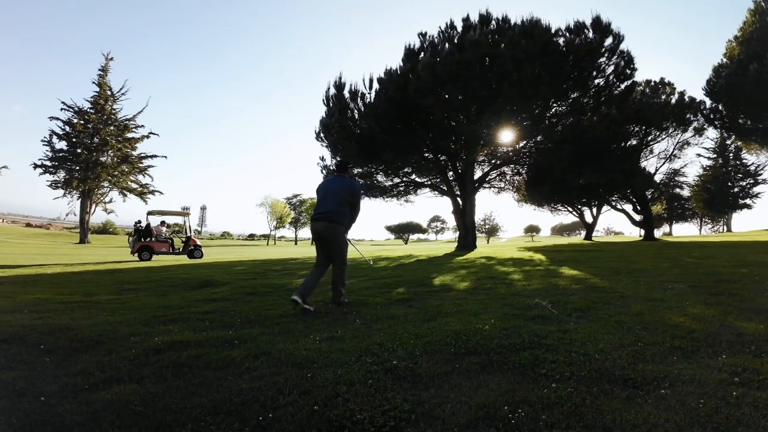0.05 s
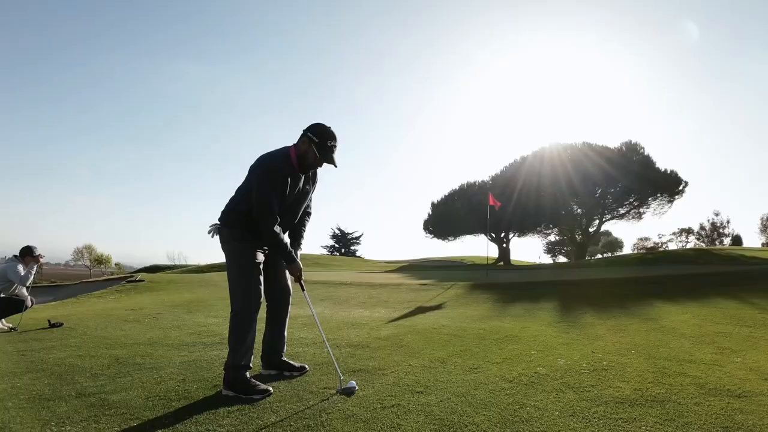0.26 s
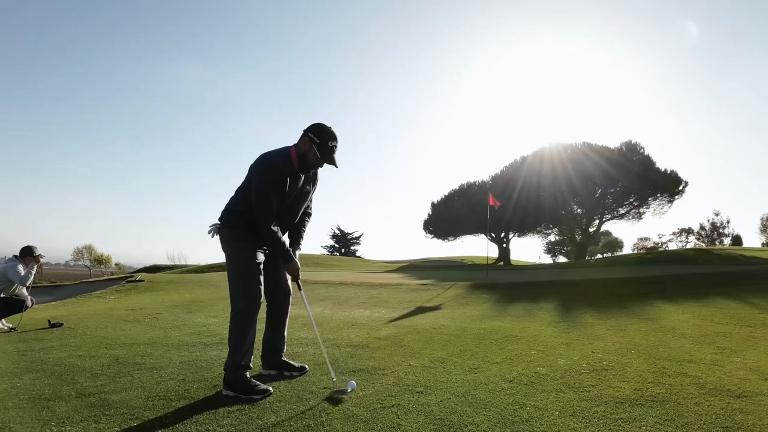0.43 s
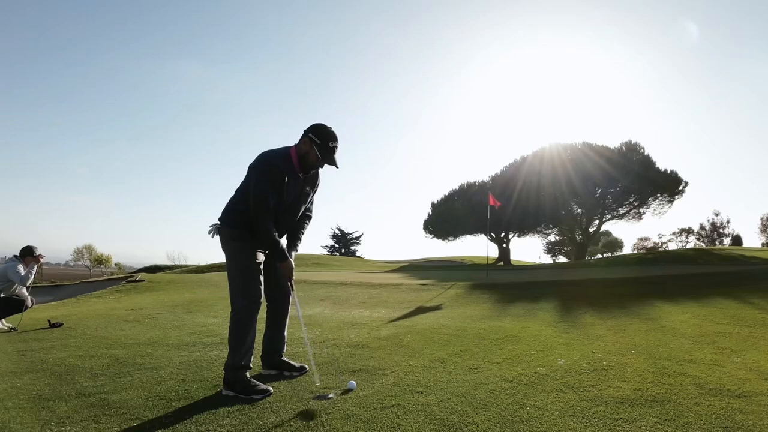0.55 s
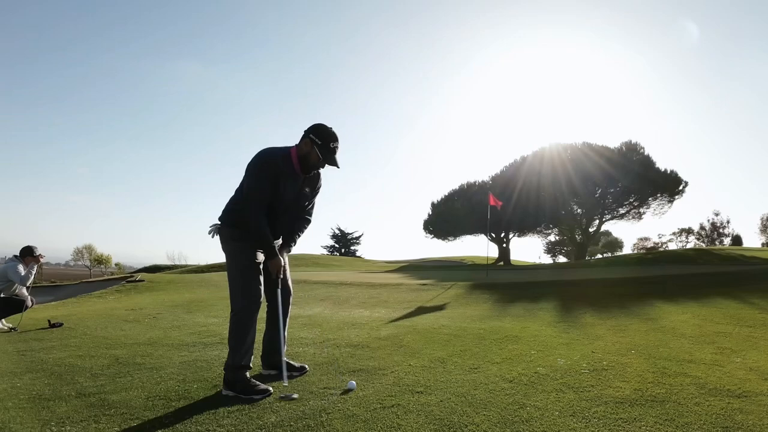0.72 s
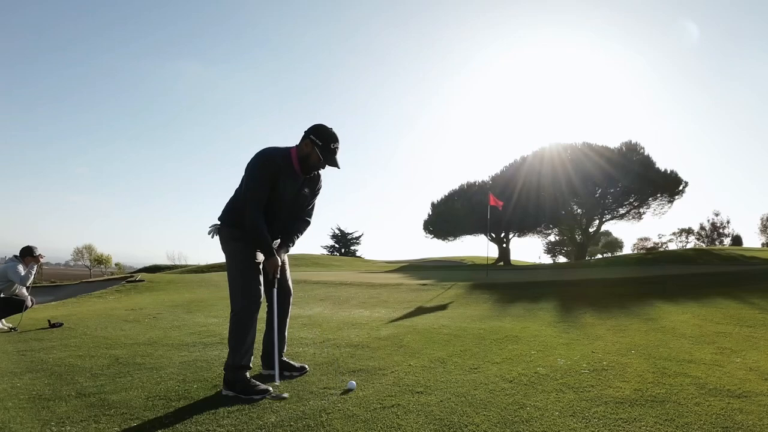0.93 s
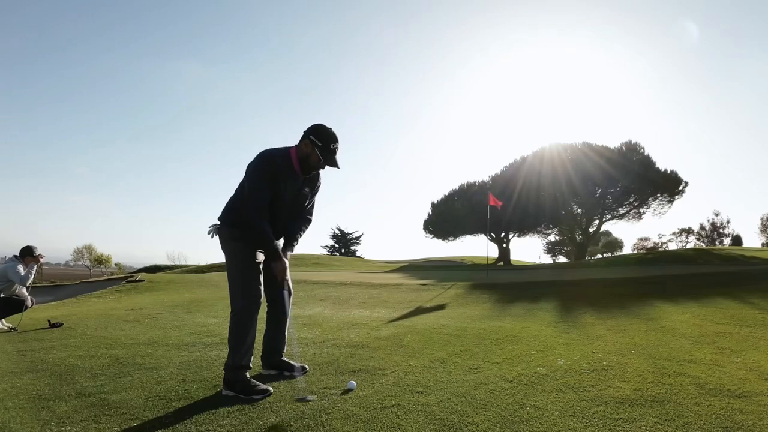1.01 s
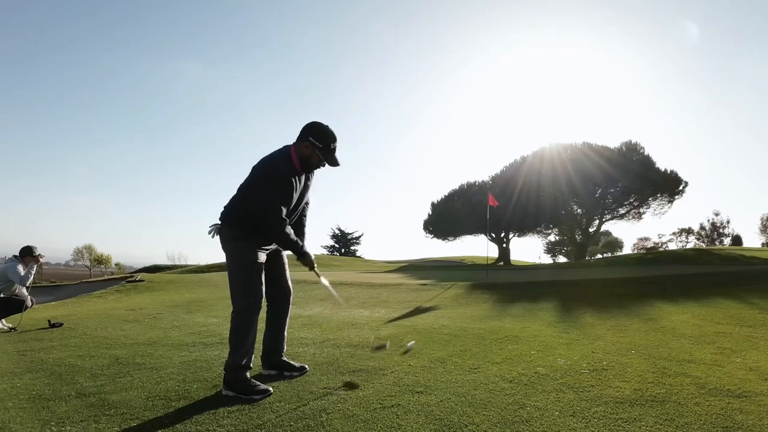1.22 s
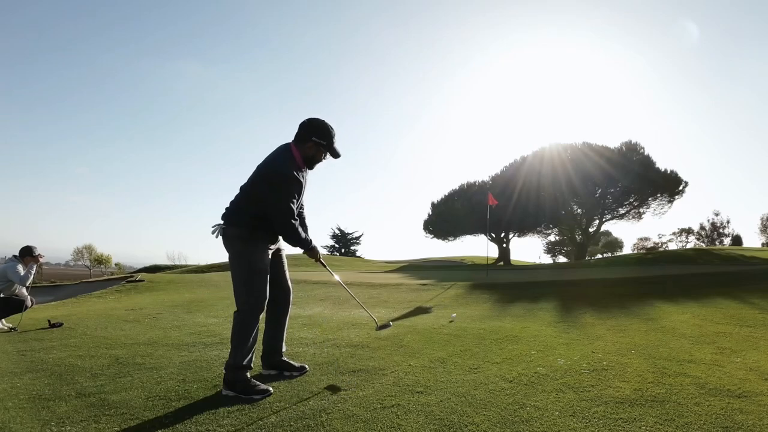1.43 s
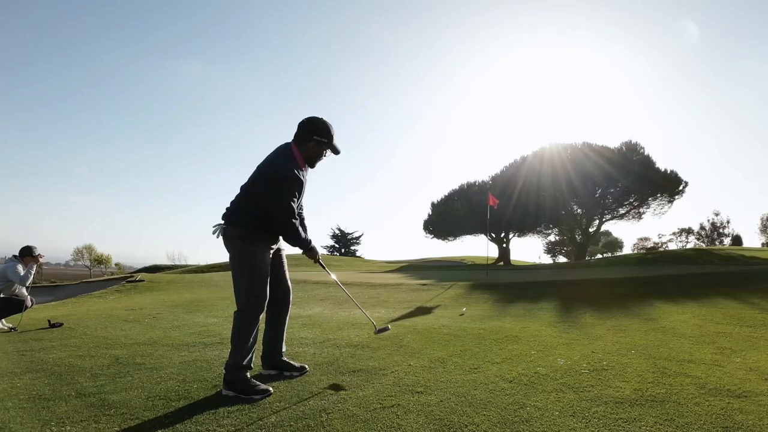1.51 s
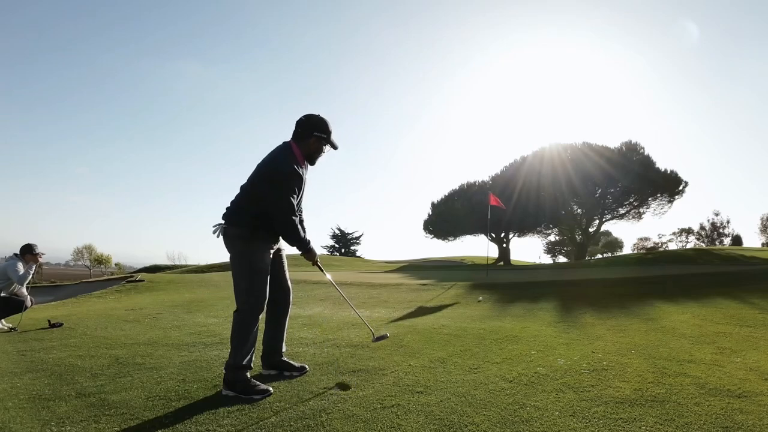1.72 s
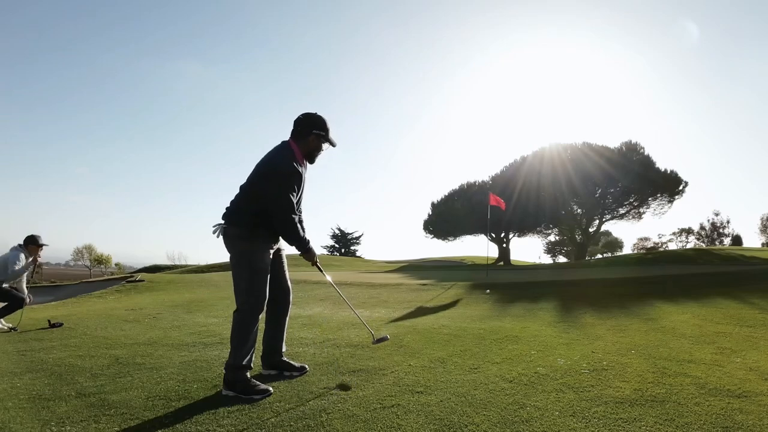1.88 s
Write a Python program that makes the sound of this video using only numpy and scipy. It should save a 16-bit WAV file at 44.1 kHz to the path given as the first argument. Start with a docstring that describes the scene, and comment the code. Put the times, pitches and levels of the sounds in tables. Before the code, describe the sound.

A putter strikes a golf ball with one sharp click, over low wind rumble.

```python
"""An open golf green. A putter strikes the ball once: a dry click and a brief ring of ball and head,
then the ball skips off over the grass. Wind rumbles, flutters and thumps on the two microphone ports.
Behind it lie a faint distant wash, thin hiss and a few far bird notes. A brighter opening hiss
cuts off with a short click; two faint dry ticks come later."""
import sys
import numpy as np
from scipy import signal
from scipy.fft import rfft, irfft
from scipy.io import wavfile
from scipy.ndimage import uniform_filter1d

SR = 44100
rng = np.random.default_rng(int(sys.argv[2]) if len(sys.argv) > 2 else 0)


def transcribe(u):
    """Save the signal u as a 16-bit wav file named by the first command-line argument.

    u: samples, shape (n,) or (channels, n), limited to [-1, 1]; the rate is SR.
    q: integer samples, one column per channel.
    """
    v = np.clip(np.atleast_2d(u).T, -1, 1)
    q = np.round(v * 32767).astype(np.int16)
    wavfile.write(sys.argv[1], SR, q)


N = 85995


def undb(db):
    """Decibels to gain."""
    return 10 ** (np.asarray(db) / 20)


def noise(colour):
    """Noise of rms 1, shaped by (frequency [Hz], relative level [dB]) points."""
    hz, db = np.array(colour, float).T
    bins_hz = np.maximum(np.fft.rfftfreq(N, 1 / SR), 1)
    gain = undb(np.interp(np.log(bins_hz), np.log(hz), db)) * (bins_hz > 2)
    shaped = irfft(rfft(rng.standard_normal(N)) * gain, N)
    return shaped / shaped.std()


def stereo_noise(colour, side_db):
    """Mid noise of rms 1 plus a weaker side noise."""
    return noise(colour) + undb(side_db) * noise(colour) * np.array([[1], [-1]])


def steady_noise(colour, span_s):
    """Noise held near rms 1 over each short span."""
    raw = noise(colour)
    return raw / np.sqrt(uniform_filter1d(raw * raw, int(span_s * SR)) + 1e-9)


def decay(age_s, t60_s):
    """Sudden start, exponential fall."""
    return (age_s >= 0) * np.exp(-np.log(1000) * np.maximum(age_s, 0) / t60_s)


# spectra of wash, thin hiss and opening hiss (frequency [Hz], relative level [dB])
WASH_SPECTRUM = [(100, 12.5), (400, 0.5), (800, 2.5), (1200, -0.5), (2000, -10.5), (3500, -19.5),
                 (5800, -28.5), (8000, -35.5), (11500, -34.5), (13000, -37), (16000, -40)]
THIN_HISS_SPECTRUM = [(1000, 8), (3000, 2.5), (5800, 0.5), (8000, -5.5), (11500, -8.5), (13000, -18),
                      (16000, -24)]
OPENING_HISS_SPECTRUM = [(100, 18.5), (400, 9), (1200, -1), (2200, -2.5), (3500, -10), (7000, -7.5),
                         (11500, -7), (13200, -7), (15500, -7)]
OPENING_END_S = 0.155


def background(t):
    """Distant wash and thin hiss of open land; a brighter hiss stops abruptly near the start."""
    wash = undb(-66) * stereo_noise(WASH_SPECTRUM, side_db=-11.5)
    thin_hiss = undb(-75) * np.array([noise(THIN_HISS_SPECTRUM) for _ in range(2)])
    opening_hiss = undb(-60.5) * stereo_noise(OPENING_HISS_SPECTRUM, side_db=-8.5)
    return wash + thin_hiss + opening_hiss * (t < OPENING_END_S)


# gusts (time [s], relative rumble level [dB], relative flutter level [dB], left minus right [dB])
GUSTS = [(0.0, -35.5, -66, 3), (0.194, -47.5, -63.5, -2.5), (0.232, -31.5, -56, 1.5), (0.32, -44, -78, -4),
         (0.362, -28.5, -53.5, 3), (0.428, -37, -67, -0.5), (0.516, -40, -61, -3), (0.542, -57, -78, 0),
         (0.57, -25.5, -40.5, 10.5), (0.602, -32.5, -58.5, 1), (0.662, -38, -65, -2.5),
         (0.71, -29.5, -82, 3), (0.776, -43, -62.5, 0.5), (0.82, -21, -49, -2), (0.862, -39.5, -58, -0.5),
         (0.922, -25, -68, -12), (0.95, -43, -69, -2), (0.998, -30.5, -63, 4), (1.052, -22, -26, -5.5),
         (1.096, -30, -67.5, -11), (1.128, -29, -79, -4), (1.162, -35, -48.5, -9), (1.2, -25.5, -59, 19.5),
         (1.242, -28, -58, -4), (1.276, -27.5, -36.5, 4.5), (1.356, -36.5, -57.5, -13),
         (1.406, -41.5, -91, 8), (1.444, -20, -40, 3.5), (1.472, -21.5, -45.5, -5), (1.514, -26, -26, -3.5),
         (1.542, -32, -68, 2), (1.59, -31, -70, 4.5), (1.634, -31, -62, 1), (1.672, -33.5, -49.5, 3.5),
         (1.7, -34.5, -79, -4), (1.726, -43.5, -68, 1), (1.894, -41.5, -65, -2), (1.95, -43, -67, -3)]
# turbulence spectra (frequency [Hz], relative level [dB])
RUMBLE_SPECTRUM = [(8, -20), (20, 0), (32, 5), (60, -2), (100, -13.5), (150, -19.5), (220, -38),
                   (400, -69.5), (2000, -130)]
FLUTTER_SPECTRUM = [(60, -18.5), (120, -7), (170, -1), (250, -4.5), (350, -19.5), (500, -29.5), (800, -47),
                    (1500, -75), (4000, -120)]
RUMBLE_TRIM_DB, FLUTTER_TRIM_DB, FLUTTER_CAP_DB = -1.5, -0.5, -42


def wind(t):
    """Separate turbulence at each port: a deep rumble, and a flutter that comes with the gusts."""
    times_s, *columns = np.array(GUSTS).T
    rumble_db, flutter_db, balance_db = (np.interp(t, times_s, column) for column in columns)
    rumble_gain = undb(rumble_db + RUMBLE_TRIM_DB)
    flutter_gain = undb(np.minimum(flutter_db + FLUTTER_TRIM_DB, FLUTTER_CAP_DB))
    turbulence = np.array([rumble_gain * steady_noise(RUMBLE_SPECTRUM, span_s=0.035)
                           + flutter_gain * steady_noise(FLUTTER_SPECTRUM, span_s=0.03)
                           for _ in range(2)])
    pan = undb(np.array([balance_db, -balance_db]) / 2)
    return turbulence * pan / np.sqrt(np.mean(pan ** 2, axis=0))


# one click, then two ticks (time [s], peak [dB], lower band edge [Hz], upper band edge [Hz])
CLICK_AND_TICKS = [(.152, -44.5, 220, 1920), (1.48, -55, 3700, 5200), (1.8518, -55, 1650, 2980)]


def click_and_ticks(t):
    """A short click where the opening hiss cuts off; two faint dry ticks later."""
    out = 0
    for start_s, peak_db, low_hz, high_hz in CLICK_AND_TICKS:
        burst = undb(-17.5) * decay(t - start_s, t60_s=0.011) * rng.standard_normal(N)
        burst[int(start_s * SR)] = 1  # impulse ahead of the noise tail
        band = signal.butter(2, [low_hz, high_hz], "band", fs=SR, output="sos")
        pulse = signal.sosfilt(band, burst + 1e-18)
        out = out + undb(peak_db) * pulse / np.abs(pulse).max()
    return out


# bird notes (time [s], length [s], peak [dB], start pitch [Hz], end pitch [Hz])
BIRD_NOTES = [(0.156, 0.076, -73, 5540, 5730), (0.215, .026, -78.5, 4600, 4600),
              (.268, 0.036, -80.5, 5870, 6060), (0.339, 0.032, -79, 5040, 5250),
              (0.993, 0.031, -80, 5300, 5420), (1.015, 0.0193, -80, 5980, 5700),
              (1.064, .085, -85, 5130, 5200)]


def birds(t):
    """Thin, slightly gliding whistles from distant trees."""
    out = 0
    for start_s, length_s, peak_db, start_hz, end_hz in BIRD_NOTES:
        progress = np.clip((t - start_s) / length_s, 0, 1)
        pitch_hz = start_hz + (end_hz - start_hz) * progress
        whistle = np.sin(2 * np.pi * np.cumsum(pitch_hz) / SR)
        out = out + undb(peak_db) * np.sin(np.pi * progress) * whistle
    return out


# eddies (time [s], peak before the left/right split [dB], half width [ms], left share [0-1])
PORT_EDDIES = [(0.363, -24, 3.4, 0.92), (0.5717, -18.5, 1.16, 1), (.577, -36, 0.54, 0.69),
               (0.811, -29.5, 1.74, 0.22), (1.0476, -8.5, 1.33, 0.96), (1.0514, -10, 2.2, .03),
               (1.059, -25, 0.92, 0.2), (1.267, -27, 1.65, 0.95), (1.311, -23, 1.9, 0.04),
               (1.438, -18, 4.2, 1), (1.4553, -20.5, 1.1, 0.05), (1.501, -22.5, 1.57, 0),
               (1.52, -30, 0.92, 0.09), (1.646, -27.5, 1.25, .1), (1.671, -29, 1.15, 0.04)]
EDDY_FALLOFF = 4.6


def eddies(t):
    """An eddy crossing a port swings the pressure once each way: a thump."""
    out = 0
    for centre_s, peak_db, half_width_ms, left_share in PORT_EDDIES:
        position = (t - centre_s) * 1000 / half_width_ms
        envelope = (2 * EDDY_FALLOFF / (2 * EDDY_FALLOFF - 1 + position ** 2)) ** EDDY_FALLOFF
        split = np.array([[left_share], [left_share - 1]])  # opposite polarity on the right
        out = out + undb(peak_db) * position * envelope * split
    return out


# modes of ball and putter head (frequency [Hz], relative level [dB], t60 [s])
PUTT_MODES = [(1220, -31, 0.0092), (1780, -32, 0.0061), (2350, -27, 0.006), (3687, -24, 0.016),
              (5200, -34, 0.0033), (5680, -29, 0.0086), (6450, -33, .009), (7670, -38.5, 0.011),
              (8370, -37.5, .008), (9830, -36, 0.011), (11700, -39.5, 0.0087)]
# spectrum of the impact crack (frequency [Hz], relative level [dB])
CRACK_SPECTRUM = [(500, -28), (2900, -19), (4300, -16), (5300, 4), (8000, -4.5), (11800, -2.5), (16000, -8)]
PUTT_S, CONTACT_MS, CONTACT_EXPONENT = 1.16333, 0.625, 0.49
RING_DELAY_MS, RING_TRIM_DB = 0.32, -1


def putt(t):
    """The jolted ball radiates one push-pull pulse and a crack; ball and head ring."""
    age_s = t - PUTT_S
    contact_rad = np.pi * np.clip(age_s * 1000 / CONTACT_MS, 0, 1)
    knock = -undb(-11.5) * np.abs(np.sin(contact_rad)) ** CONTACT_EXPONENT * np.cos(contact_rad)
    crack = undb(-31) * decay(age_s, t60_s=0.008) * noise(CRACK_SPECTRUM)
    ring_age_s = age_s - RING_DELAY_MS / 1000
    ring = sum(undb(db + RING_TRIM_DB) * decay(ring_age_s, t60_s) * np.sin(2 * np.pi * hz * ring_age_s)
               for hz, db, t60_s in PUTT_MODES)
    return knock + crack + ring


# spectrum of the turf scatter (frequency [Hz], relative level [dB])
SCATTER_SPECTRUM = [(400, 4), (2000, -2), (3700, -4.5), (12000, -3.5)]
ECHO_DELAY_MS, ECHO_CUTOFF_HZ = 2.55, 2500


def turf(t, direct):
    """The turf returns a dull echo and a faint scatter."""
    dulled = signal.lfilter(*signal.butter(1, ECHO_CUTOFF_HZ, fs=SR), direct)
    echo = np.interp(t - ECHO_DELAY_MS / 1000, t, dulled)
    response = stereo_noise(SCATTER_SPECTRUM, side_db=-10.5) * decay(t, t60_s=0.082)
    response /= np.sqrt(np.sum(response[0] ** 2))
    scatter = signal.fftconvolve(response, direct[None], axes=1)[:, :N]
    return undb(-17) * echo + undb(-23.5) * scatter


# balance of the putt at the ports (frequency [Hz], left minus right [dB])
PUTT_BALANCE = [(2000, -1), (3700, 1.5), (6000, 2), (9000, 0)]
LEFT_LEAD_US = 9.2


def ports(sound):
    """Two close microphone ports hear one sound with slightly different level and delay."""
    bins_hz = np.fft.rfftfreq(N, 1 / SR)
    balance_db = np.interp(bins_hz, *np.array(PUTT_BALANCE).T)
    lead_rad = 2 * np.pi * bins_hz * LEFT_LEAD_US / 1e6
    split = np.array([[0.5], [-0.5]])
    return irfft(rfft(sound) * undb(split * balance_db) * np.exp(1j * split * lead_rad), N)


# touches of ball on grass (time [s], level [dB], Gaussian sigma [s])
BALL_SKIPS = [(1.18, -73.5, 0.013), (1.211, -66.5, 0.016), (1.319, -70.5, 0.018), (1.422, -73.5, .016),
              (1.551, -75, 0.0089), (1.69, -80.5, 0.01)]
# spectrum of brushed grass (frequency [Hz], relative level [dB])
GRASS_SPECTRUM = [(500, -0.5), (2000, -1), (2900, 2.5), (3750, 3), (4500, -2.5), (7500, -0.5),
                  (11500, -1.5), (13200, 1), (16000, -2.5)]


def skips(t):
    """Grass blades swish at each skip, weaker as the ball settles into its roll."""
    envelope = sum(undb(db) * np.exp(-0.5 * ((t - centre_s) / sigma_s) ** 2)
                   for centre_s, db, sigma_s in BALL_SKIPS)
    return envelope * stereo_noise(GRASS_SPECTRUM, side_db=-16)


def scene():
    """The course around, the wind on the ports, the putt straight ahead."""
    t = np.arange(N) / SR
    strike = putt(t)
    ball = ports(strike + turf(t, strike)) + skips(t)
    return ball + click_and_ticks(t) + wind(t) + eddies(t) + birds(t) + background(t)


# microphone treble response (frequency [Hz], gain [dB])
MIC_RESPONSE = [(11800, 1), (12700, -9.5), (16000, -11.5)]
LOWPASS_HZ = 15750


def record(dry):
    """The microphone dulls the highest treble; a steep low-pass cuts the top."""
    gain_db = np.interp(np.fft.rfftfreq(N, 1 / SR), *np.array(MIC_RESPONSE).T)
    dulled = irfft(rfft(dry) * undb(gain_db), N)
    lowpass = signal.ellip(8, 0.2, 70, LOWPASS_HZ, fs=SR, output="sos")
    return signal.sosfilt(lowpass, dulled)


dry = scene()
out = record(dry)
transcribe(out)
```